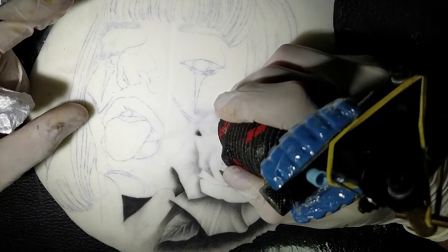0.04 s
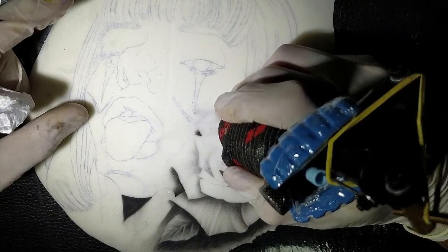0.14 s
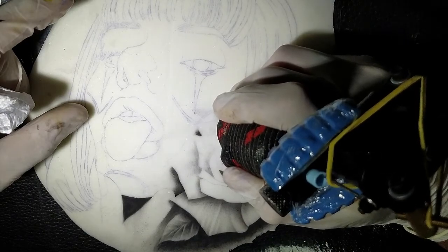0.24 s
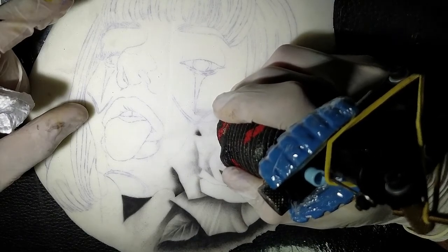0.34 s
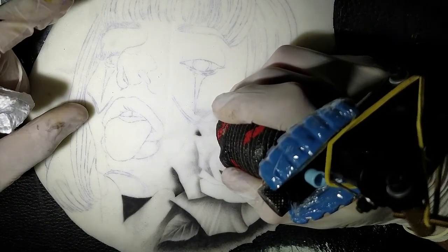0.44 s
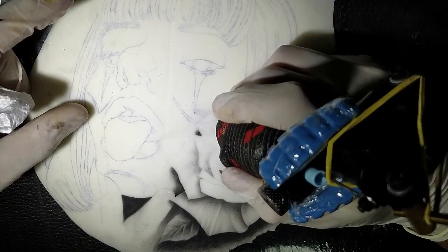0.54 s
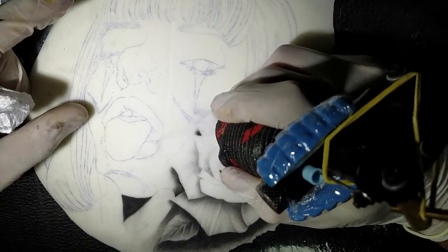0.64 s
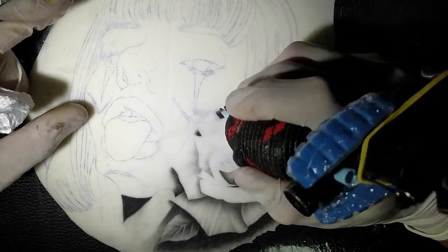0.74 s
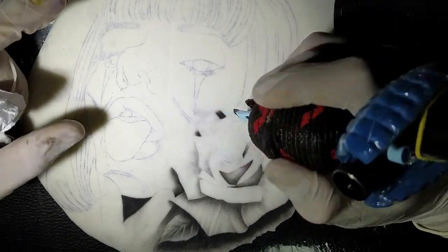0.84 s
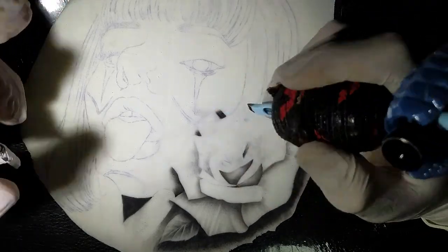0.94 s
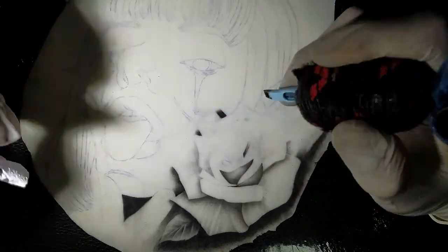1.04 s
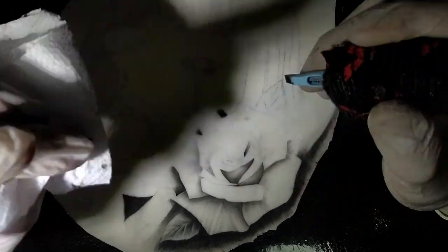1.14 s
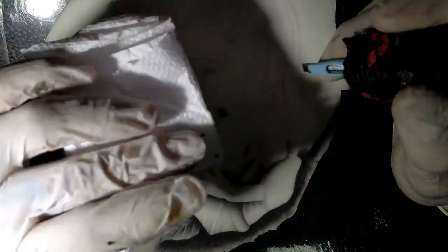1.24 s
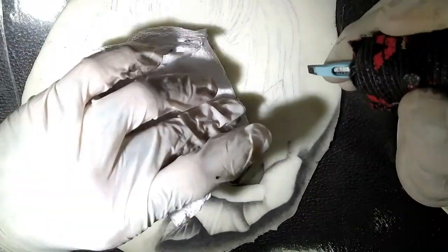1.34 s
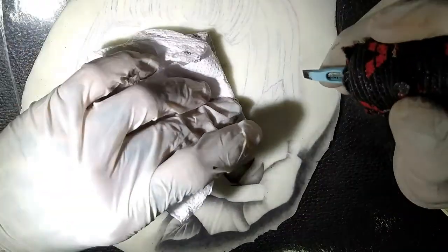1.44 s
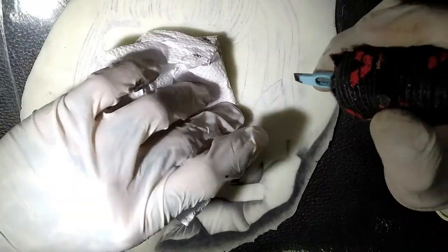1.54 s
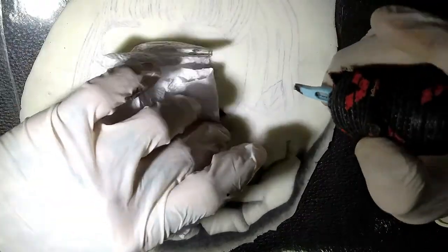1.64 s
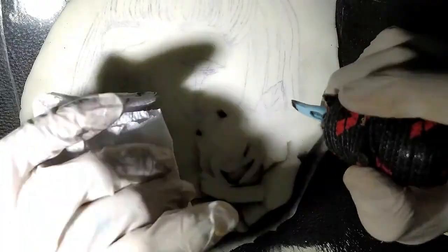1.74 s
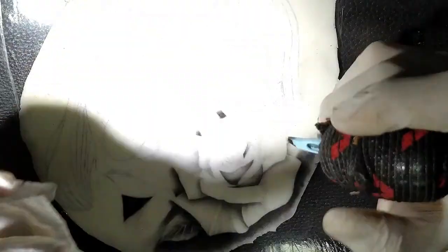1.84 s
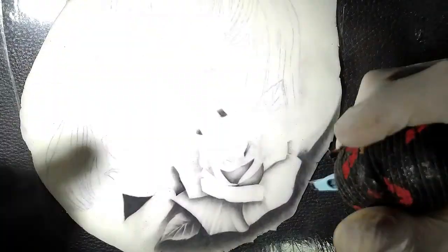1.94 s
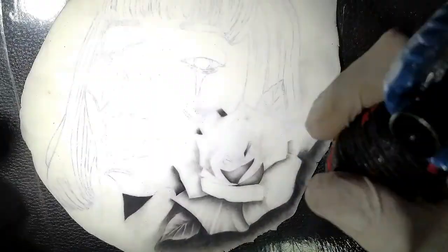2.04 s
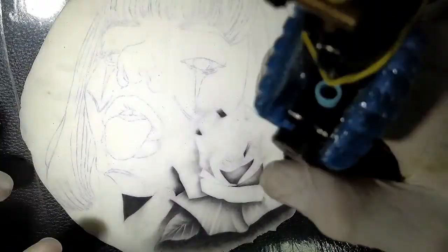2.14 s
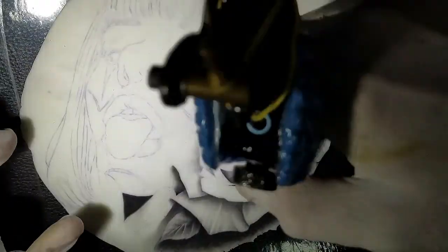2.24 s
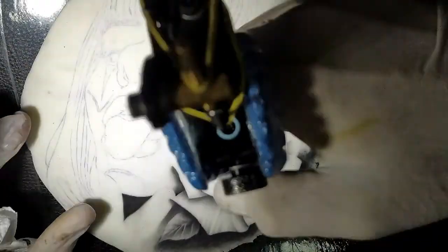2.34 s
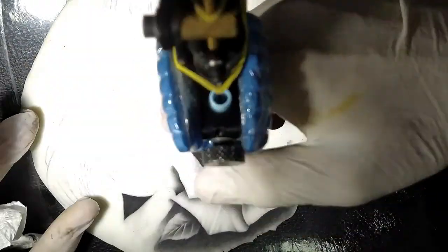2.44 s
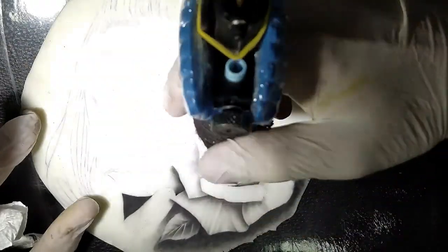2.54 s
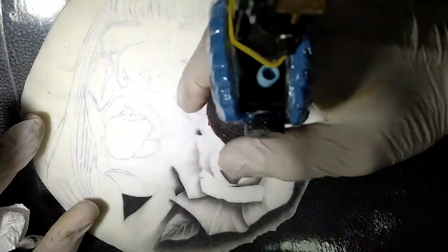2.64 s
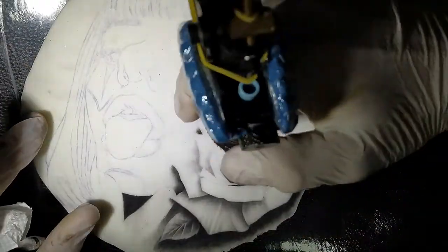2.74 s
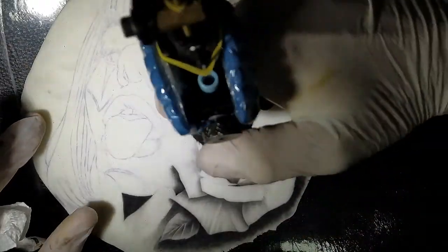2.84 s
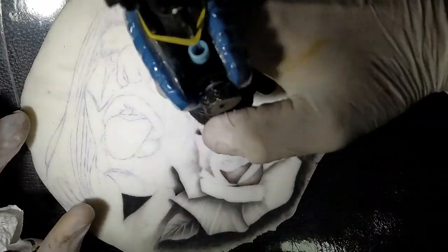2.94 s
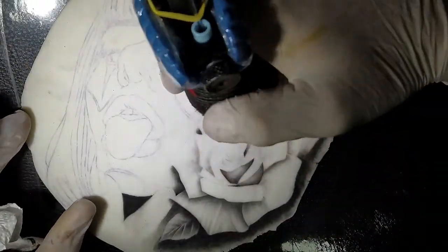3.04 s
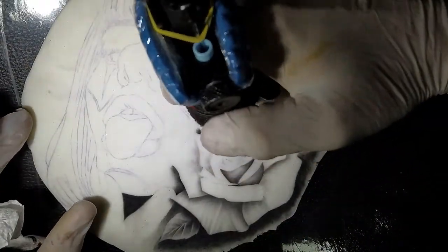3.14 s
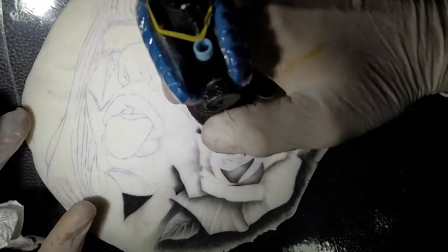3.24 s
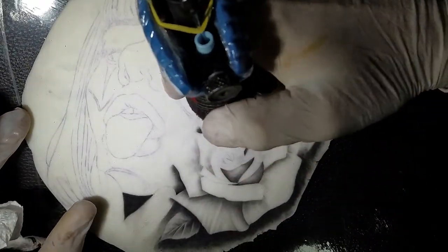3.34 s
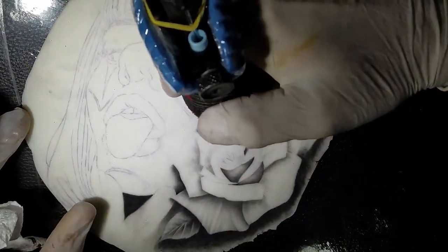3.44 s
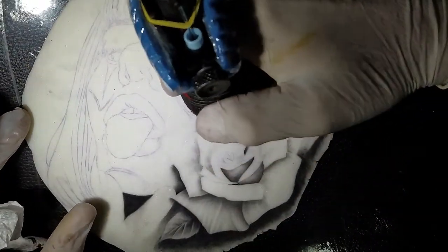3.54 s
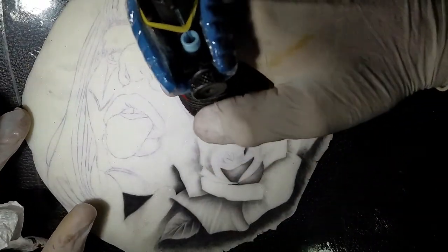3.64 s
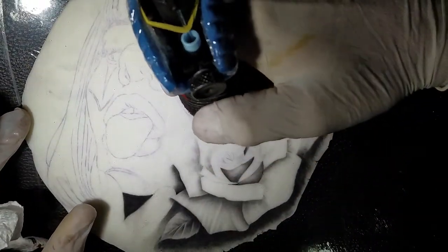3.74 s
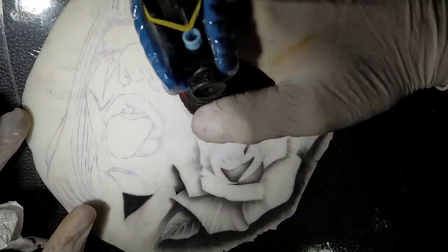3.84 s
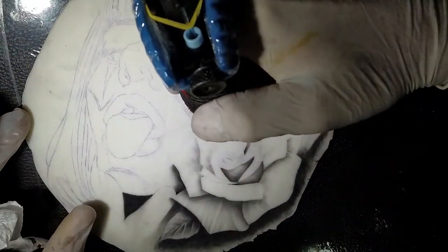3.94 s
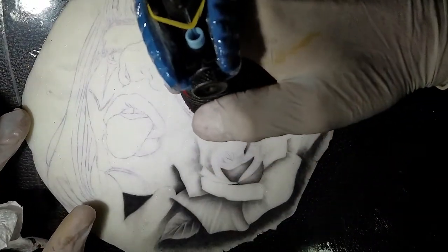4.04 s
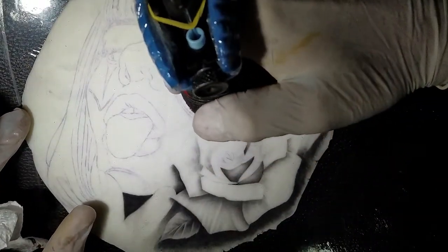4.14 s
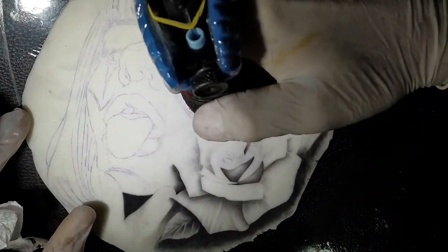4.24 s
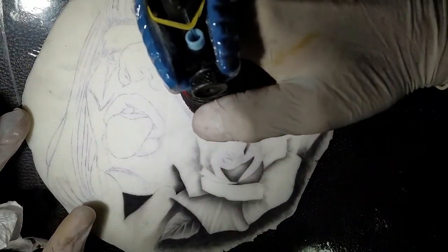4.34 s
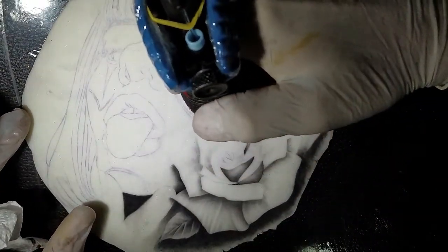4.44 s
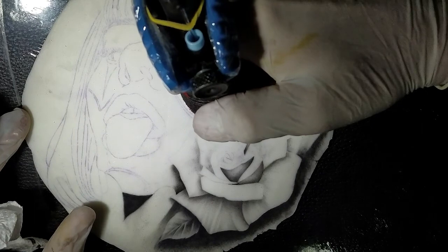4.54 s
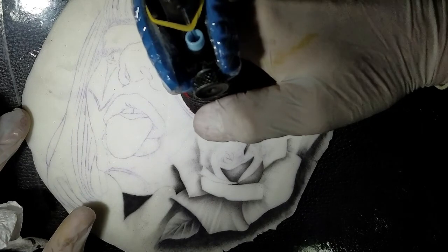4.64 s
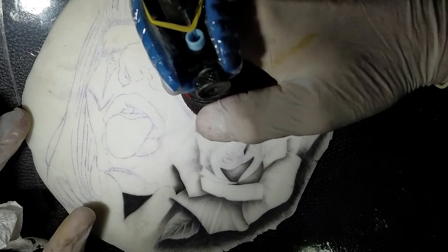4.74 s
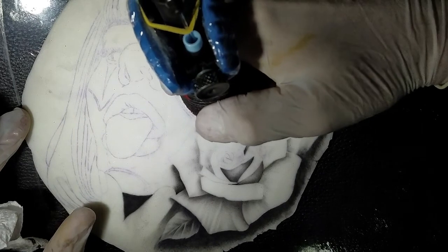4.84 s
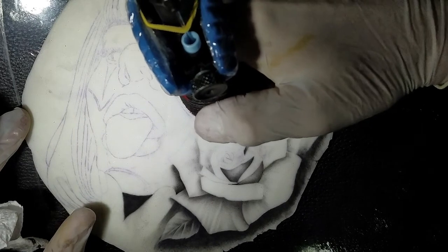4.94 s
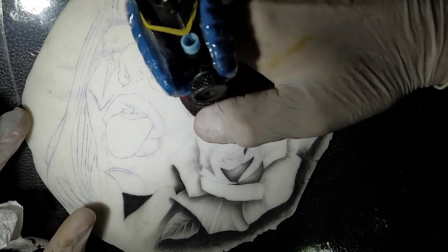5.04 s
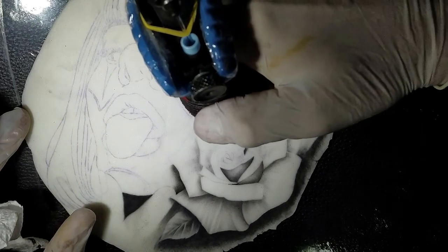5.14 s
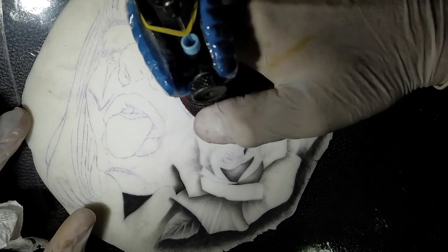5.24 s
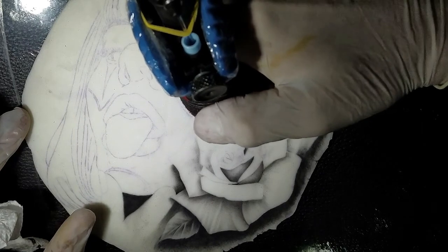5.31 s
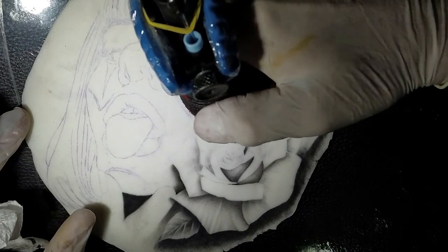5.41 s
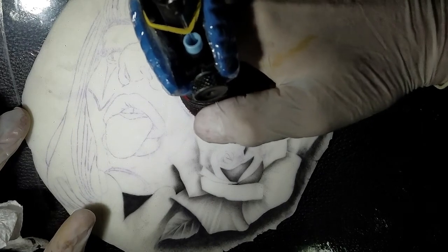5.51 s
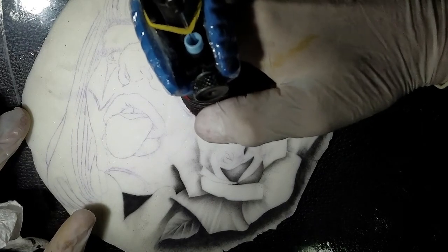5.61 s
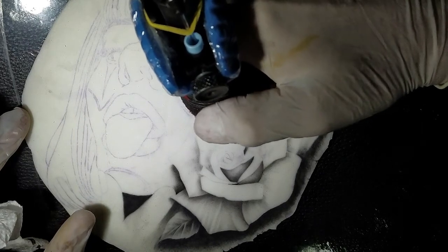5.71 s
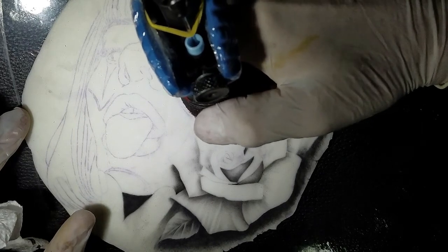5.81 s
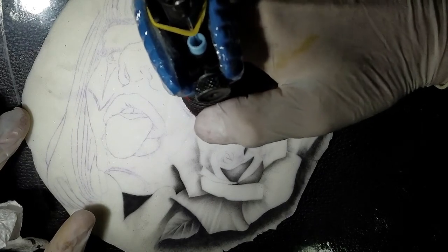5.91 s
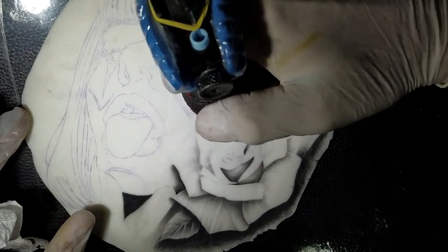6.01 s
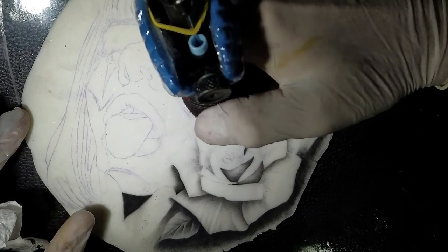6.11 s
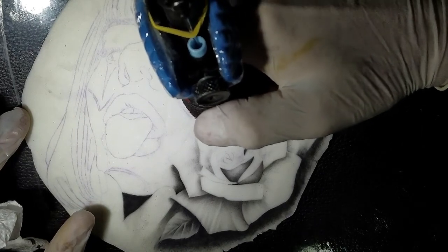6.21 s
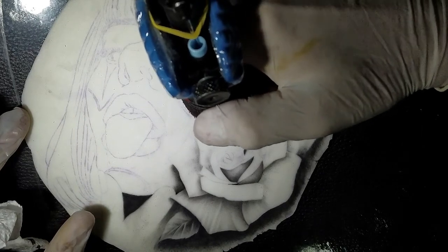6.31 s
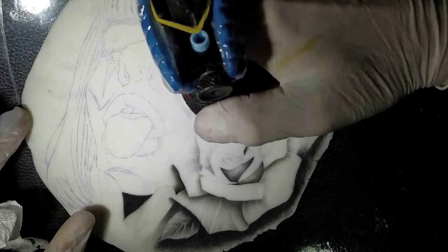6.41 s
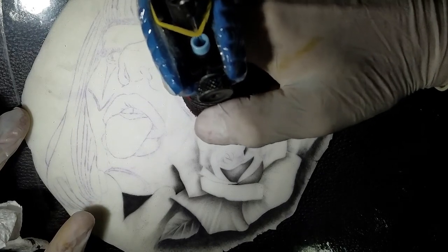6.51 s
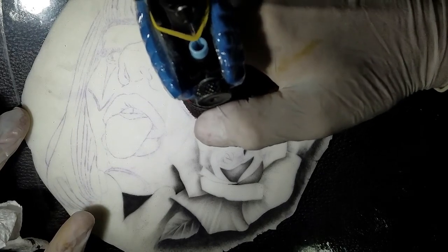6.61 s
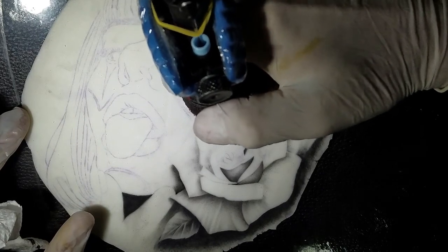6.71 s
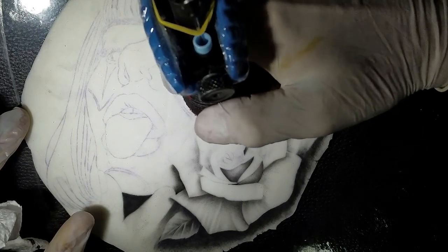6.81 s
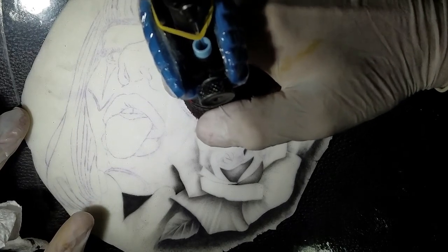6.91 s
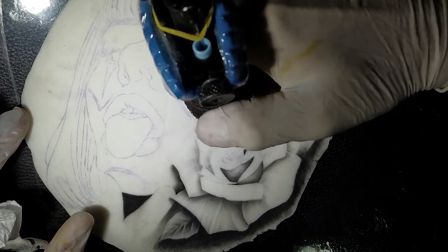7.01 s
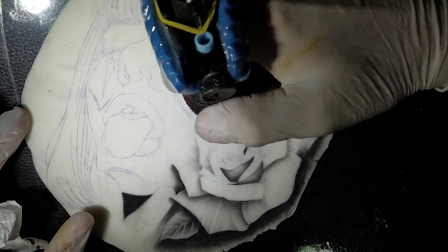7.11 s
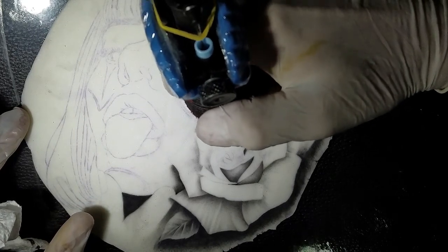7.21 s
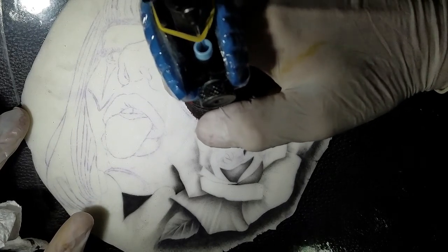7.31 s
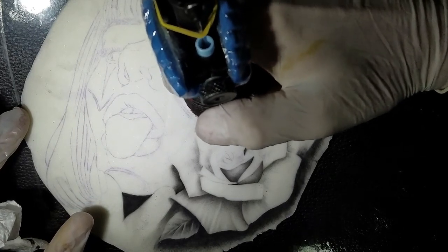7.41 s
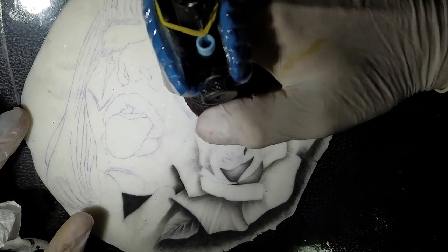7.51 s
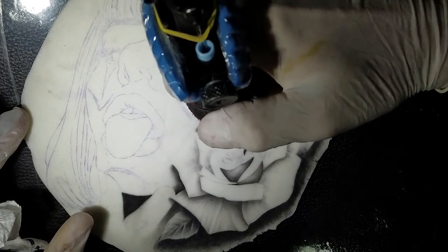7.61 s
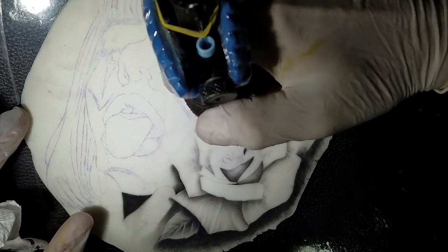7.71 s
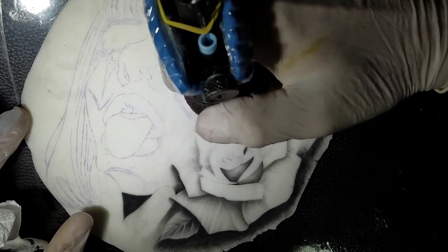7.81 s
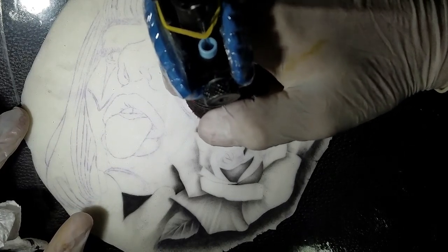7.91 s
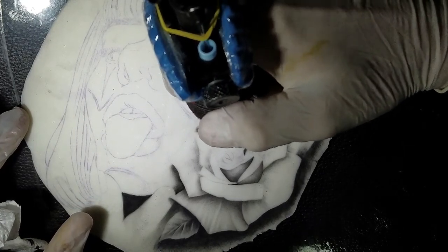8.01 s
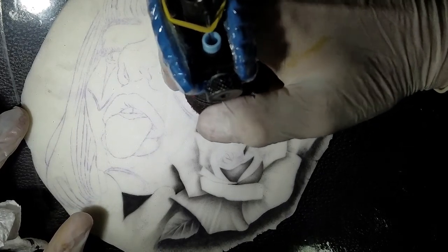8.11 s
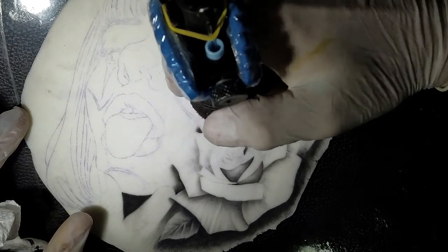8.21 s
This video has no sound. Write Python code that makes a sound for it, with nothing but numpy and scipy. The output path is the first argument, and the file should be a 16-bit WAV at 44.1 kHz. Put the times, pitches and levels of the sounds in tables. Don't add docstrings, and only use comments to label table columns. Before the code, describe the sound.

Close raspy electric buzzing cuts out, restarts briefly after bright ticks, cuts out again, then drones on with small gritty catches in a hard room.

```python
import sys
import numpy as np
from scipy import signal
from scipy.fft import rfft, irfft
from scipy.io import wavfile
from scipy.ndimage import uniform_filter1d

SR = 44100
rng = np.random.default_rng(int(sys.argv[2]) if len(sys.argv) > 2 else 0)


def generate_wav(signal):
    frames = np.transpose(np.atleast_2d(signal))
    scaled = np.clip(frames, -1, 1) * 32767
    pcm = np.round(scaled).astype(np.int16)
    wavfile.write(sys.argv[1], SR, pcm)


def level_to_linear(level):
    exponent = np.asarray(level, float) / 20
    return 10 ** exponent


N = 364266
SIDES = np.array([[.5], [-.5]])

# multiple of the shaft rate [1], level/dB
FAN_HARMONICS = [(2, 0), (4, -13), (6, -2), (7, -10), (8, -11), (9, -15), (11, -19), (15, -21), (34, -21),
                 (36, -29), (38, -25), (40, -26)]
# f/Hz, level/dB [per Hz]
FAN_AIR = [(15, -43), (32, -7), (64, -14), (92, -16), (108, -14), (200, -2.5), (330, -7), (516, -10),
           (695, -9.5), (754, -15), (962, -13.5), (1230, -18), (4140, -34), (16000, -37)]
# t/s, level/dB
LOWEST_HUM = [
    (0, 1.5),
    (2.38, 1.5),
    (2.47, -1.2),
    (8.26, -1.2),
]
# t/s, level/dB
GAIN = [
    (0, -45.5),
    (.5, -46.5),
    (1.1, -42),
    (1.74, -39.5),
    (1.82, -43),
    (2.38, -38.5),
    (2.47, -45),
    (8.26, -45),
]
# t/s, level/dB
TOWEL = [
    (1.2, -43.5),
    (1.42, -56.5),
    (1.545, -50),
    (1.565, -42),
    (1.645, -50),
    (1.656, -40),
    (1.665, -47),
    (1.725, -54),
]
# t/s, level/dB, low ring level/dB
SPRING_TICKS = [
    (1.7351, -20, -5),
    (1.745, -17, 2),
    (1.7553, -16, -5),
    (1.7656, -14, 4),
    (2.379, -16.5, -8),
    (2.3877, -6, -14),
    (2.398, -8, -7),
    (2.4088, -5, -9),
    (2.4184, -3, -8),
]
# t/s, rate [strokes per s]
STROKE_RATE = [
    [(0.0074, 111.2), (.7, 110.8), (.84, 113), (.93, 106.5), (1.0405, 104.2)],
    [(1.7718, 110.4), (2.186, 103.8)],
    [(2.4245, 108.5), (2.67, 106), (2.95, 110.6), (3.2, 109.6), (3.5, 109.4), (3.9, 110.0), (4.15, 110.7),
     (4.5, 110.5), (4.8, 109.5), (5.4, 108.9), (6.4, 108.9), (6.55, 110.2), (6.7, 109.5), (6.95, 109.9),
     (7.15, 111.0), (7.5, 110.75), (8.26, 110.7)],
]
# t/s, pose [0 slanted, 1 lifted, 2 turning, 3 upright, 4 eased]
GRIP = [
    (0, 0),
    (.86, 0),
    (.92, 1),
    (2.3, 1),
    (2.4, 2),
    (2.98, 2),
    (3.06, 3),
    (6.45, 3),
    (6.55, 4),
    (8.26, 4),
]
# t/s, state [0 slanted, 1 lifted, 2 upright, 3 pressed, 4 pressed and sliding]
NEEDLE = [(0, 0), (.86, 0), (.92, 1), (2.3, 1), (2.4, 2), (3.47, 2), (3.55, 3), (4.68, 3), (4.76, 4),
          (6.45, 4), (6.55, 2), (8.26, 2)]
# t/s, slap level/dB, loosely held frame ring level/dB, needle thud level/dB
HAND = [(0, -25, -10.5, -21), (.7, -24.5, -9, -21), (.84, -23.5, -4, -19.5), (1.04, -26.5, -7.5, -29),
        (1.773, -26.5, -8, -28), (1.781, -25.5, -5, -23.5), (2.05, -23.5, -5.5, -26.5),
        (2.19, -28, -9, -27), (2.42, -22, -17.5, -17.5), (2.72, -24, -9.5, -17.5), (2.91, -20, -10, -13.5),
        (3.05, -23.5, -18, -13), (3.45, -22.5, -12, -16), (3.56, -21.5, -7, -8.5),
        (4.7, -21.5, -7.5, -11.5), (6.4, -21.5, -8.5, -10.5), (6.6, -22.5, -12, -14.5),
        (8.26, -22.5, -10, -17)]
# t/s, length/s, thud level/dB
CATCHES = [(2.524, 0.02, 5), (2.687, 0.04, -6.5), (2.917, 0.047, 3.5), (3.02, 0.033, 0.5),
           (3.09, 0.012, -8), (3.158, 0.018, 1), (3.627, 0.011, 1), (3.727, 0.013, 2), (3.785, 0.027, -3),
           (3.832, 0.014, 3), (3.864, 0.016, -5), (3.886, .015, 3), (3.918, 0.023, -6), (4.03, 0.033, 4.5),
           (4.156, 0.023, -1), (4.17, 0.0069, 8), (4.678, 0.022, 4.5), (4.73, 0.018, -3), (4.994, 0.01, -4),
           (5.02, 0.017, 2.5), (5.3, 0.027, -1.5), (5.747, 0.017, 1), (5.787, .01, -3), (6.133, 0.092, 1),
           (6.227, 0.021, 2), (6.505, 0.017, 4.5), (6.563, .012, -4), (7.24, 0.02, 3.5),
           (7.268, 0.017, -10), (7.59, .015, -6), (7.672, 0.022, -3), (7.744, 0.048, 3), (7.91, 0.014, 3),
           (7.95, 0.019, -5), (8.013, 0.016, 2), (8.083, 0.023, -2.5)]
# f/Hz, width/Hz, level/dB [slanted, lifted, upright, pressed, sliding], delay/ms
THUD_RINGS = [(109, 63, 1, 5, 9, 6.5, 9.5, 2.75), (315, 370, -3, -5, 6, 3.5, 8, 1.37),
              (427, 58, 7.5, -10, -29, 1, 1, 1.6), (552, 40, 11, -18, -13, -3, -1, 2.25),
              (646, 57, -3, 17.5, 1, 10.5, 4.5, 2.03), (774, 73, 8, 10, 1, -12, 0, 2.54),
              (800, 210, -4, 0, 8.5, 5, 9.5, 2.42), (1198, 333, 2.5, 10.5, 10.5, 5.5, 6.5, 1.668),
              (1785, 720, 3, 10, 8.5, 0, 2, 0.7), (2510, 640, -36, -36, 8.5, 7.5, 5.5, 0.44)]
# f/Hz, width/Hz, level/dB [slanted, lifted, upright, pressed], left minus right/dB
FRAME_RINGS = [(3607, 116, 0.5, 3, 1.5, 1.5, -3.5), (4624, 1310, -1.5, -3.5, -4.5, -5.5, -6),
               (4527, 107, -11, -16, -23, -19.5, -3.5)]
# f/Hz, width/Hz, share taken out [slanted, upright]
FRAME_DIPS = [(3150, 200, 0.39, 0.41), (4220, 145, 0.44, 0.15), (3850, 126, 0.1, 0.27),
              (4830, 300, 0.37, 0.65), (6400, 680, 0.13, 0.084)]
# delay/ms, level/dB [slanted, upright, pressed], timing scatter/ms, level scatter/dB
CONTACTS = [
    (0, 5.5, 7.5, 6, 0.021, 1.5),
    (-0.8, -10.5, -14, -11, 0.071, 2),
    (-0.36, -8, -13, 0, 0.038, -1),
    (0.65, -8, 4, -1.5, 0.034, 4),
    (1.3, -17, -1, -4.5, 0.059, 5.5),
    (1.798, -6, -21, -15, 0.081, 0),
    (3.5, -18, -6.5, -21, 0.065, 7.5),
]
# f/Hz, width/Hz, level/dB [slanted, lifted, turning, upright, eased]
SLAP_RINGS = [(2968, 350, 0.5, -8, -4, -5.5, -2.5), (5470, 460, -6, -6, -11, -12.5, -11.5),
              (7190, 1920, 1, 2, -3.5, -4.5, -4.5), (7946, 960, 5, 4.5, 1.5, 4, 4),
              (8530, 740, 4.5, 6.5, 6, 2.5, 3.5), (9300, 1520, -4.5, -4, 0, -5, -4),
              (9890, 1100, 4.5, 2, 0, -2.5, -2), (11094, 660, -7, 2.5, -8.5, -3, -3.5),
              (12570, 2040, -7.5, -1.5, -14, -13.5, -11), (13440, 810, -8, -8, -9, -12, -12),
              (14700, 800, -7, -6, -9, -14, -7)]
# left minus right/dB [slanted, lifted, turning, upright, eased]
SLAP_PAN = [(-4, 6.5, -3, 2.5, 1), (14, -2, 7, 11, 17), (2.5, -2, -2, 1.5, 1.5), (-2.5, 3, 3, 0, 0.5),
            (-9, -4, 1, -3.5, 0.5), (7, 6, 2.5, -5, -1), (5, 17.5, 10, -5.5, 1), (23, 15, 12, 8.5, 7.5),
            (19, 9.5, 12, 6, 2), (-3, -3, -8, -10, -13), (0, 0, 6, 8, 6)]


def curve(rows, column):
    rows = np.asarray(rows, float)
    return np.interp(np.arange(N) / SR, rows[:, 0], rows[:, column])


def by_state(state, values, first=0):
    return np.interp(state, np.arange(len(values)) + first, values)


def unit(x):
    return x / np.sqrt(np.mean(x ** 2))


def clicks(at_s, size):
    at = np.clip(at_s * SR, 0, N)
    taps = np.floor(at)[:, None] + np.arange(-7, 9)
    offset = taps - at[:, None]
    shape = np.sinc(offset) * np.cos(np.pi * offset / 16) ** 2
    places = (taps + 8).astype(int).ravel()
    return np.bincount(places, (shape * size[:, None]).ravel(), N + 32)[8:N + 8]


def ring(x, hz, width_hz):
    return signal.lfilter(*signal.iirpeak(hz, hz / width_hz, SR), x)


def steep(x, hz, width_hz):
    return ring(ring(x, hz, width_hz), hz, 2 * width_hz)


def rattle(hits, ms):
    decay = np.exp(-1000 / (ms * SR))
    return signal.lfilter([1], [1, -decay], np.abs(hits)) * rng.standard_normal(N)


def walk(rate):
    k = int(SR / rate)
    held = np.repeat(rng.standard_normal(N // k + 1), k)
    return unit(uniform_filter1d(uniform_filter1d(held, k), k)[:N])


def coloured(points, shape):
    hz, db = np.transpose(points)
    gain = level_to_linear(np.interp(np.log(np.fft.rfftfreq(N, 1 / SR) + 1), np.log(hz), db))
    return irfft(rfft(rng.standard_normal(shape)) * gain, N)


def fan():
    shaft_hz, lag_ms, pan_db, air_db, shared_below_hz = 29.02, .35, 2, -0.5, 404
    turns = np.cumsum(shaft_hz * (1 + 0.00198 * walk(1.93))) / SR
    lowest_db = curve(LOWEST_HUM, column=1)
    hum = 0
    for k, db in FAN_HARMONICS:
        level_db = db + (k == 2) * lowest_db + min(k / 3.2, 2.5) * walk(7)
        hum = hum + level_to_linear(level_db) * np.sqrt(2) * np.sin(2 * np.pi * (k * turns + rng.random()))
    hum = np.array([hum, np.roll(hum, int(lag_ms * SR / 1000))])
    air = coloured(FAN_AIR, (3, N))
    bass = signal.butter(1, shared_below_hz, fs=SR, output="sos")
    air = air[1:] + signal.sosfilt(bass, air[0] - air[1:])
    return level_to_linear(curve(GAIN, column=1) + pan_db * SIDES) * (hum + level_to_linear(air_db) * unit(air))


def towel():
    t = np.arange(N) / SR
    scrape = coloured([(1200, -17), (3000, -4.0), (7000, -9), (11000, -5.5), (14000, -37)], (2, N))
    scrape = unit(scrape * level_to_linear(2.0 * walk(51.6)))
    touching = (t > TOWEL[0][0]) & (t < TOWEL[-1][0])
    return scrape * level_to_linear(curve(TOWEL, column=1)) * touching


def room(x):
    t60_s, treble_t60_s, gap_ms = 0.59, 0.46, 0.52
    t = np.arange(SR) / SR
    noise = rng.standard_normal((2, SR))
    low = signal.sosfilt(signal.butter(2, 5000, fs=SR, output="sos"), noise)
    echoes = low * level_to_linear(-60 * t / t60_s) + (noise - low) * level_to_linear(-60 * t / treble_t60_s)
    echoes = echoes * (1 - np.exp(-(1000 * t / gap_ms) ** 2))
    echoes = echoes / np.sqrt(np.sum(echoes ** 2) / 2)
    return irfft(rfft(x) * rfft(echoes, N), N)


def wind_up():
    at, db, low_db = np.transpose(SPRING_TICKS)
    tick = clicks(at + 0.00057, level_to_linear(db + 9.5))
    low = clicks(at + 0.0006, level_to_linear(db + low_db + 21.5))
    tick = tick + level_to_linear(-10.5) * rattle(tick, ms=0.47)
    spring = steep(tick, 8300, 4000) - level_to_linear(-5.0) * steep(tick, 11300, 2800)
    spring = spring + level_to_linear(-6.0) * steep(tick, 14300, 3500)
    return spring + steep(low, 3020, 380)


def strokes():
    t, at = np.arange(N) / SR, []
    wobble = 1 + .004 * walk(7)
    for run in STROKE_RATE:
        turns = np.cumsum((t >= run[0][0]) * curve(run, column=1) * wobble) / SR
        found = np.interp(np.arange(int(turns[-1])) + 1e-3, turns, t)
        at.append(found[found <= run[-1][0]])
    return np.concatenate(at)


def needle_scratch(needle):
    scratch = coloured([(200, 3), (600, -2.0), (1500, -2.0), (2400, -3.5), (3200, -45)], (2, N))
    level_db = by_state(needle, (-17, -15, -8.5, -11))
    return unit(scratch) * level_to_linear(level_db + 4.35 * walk(40))


def pad_catches(upright):
    grid_s = np.arange(0, N / SR, .001)
    swells = sum(db * np.exp(-((grid_s - s) / length) ** 2) for s, length, db in CATCHES)
    slips = .5 * np.clip(upright, .3, 1) * walk(25)
    return np.interp(np.arange(N) / SR, grid_s, swells) + slips


def needle_thud(at, needle, upright):
    thud, chance = 0, rng.standard_normal((len(at), 3)).T
    for hz, width_hz, *db, ms in THUD_RINGS:
        size_db = 2.5 * chance[1 + (ms < 1)]
        knock = clicks(at + (ms + 0.077 * chance[0]) / 1000, level_to_linear(size_db))
        thud = thud + level_to_linear(by_state(needle, db) + 1.3 * walk(7)) * steep(knock, hz, width_hz)
    body = unit(thud) + needle_scratch(needle)
    pan_db = by_state(upright, (-11.5, 14.5))
    return level_to_linear(curve(HAND, column=3) + pan_db * SIDES + pad_catches(upright) - 26.5) * body


def frame_ring(blow, push, needle):
    held_db, frame = [curve(HAND, column=2), 0, 0], 0
    for k, (hz, width_hz, *db, pan_db) in enumerate(FRAME_RINGS):
        tone = unit(ring(steep(blow + level_to_linear(-0.5) * push, hz, width_hz), hz, 810))
        level_db = held_db[k] + by_state(needle, db) + pan_db * SIDES + 0.24 * walk(4.5)
        frame = frame + level_to_linear(level_db) * tone
    return frame


def contacts(at, needle_at):
    hits = []
    for ms, *db, loose_ms, loose_db in CONTACTS:
        chance = rng.standard_normal((len(at), 2)).T
        size_db = by_state(needle_at, db, first=1) + loose_db * chance[1]
        hits.append(clicks(at + (ms + loose_ms * chance[0]) / 1000, level_to_linear(size_db)))
    return hits[0], sum(hits)


def armature_slap(push, pose):
    slap = 0
    for k, ((hz, width_hz, *db), pan_db) in enumerate(zip(SLAP_RINGS, SLAP_PAN)):
        level_db = by_state(pose, pan_db) * SIDES + by_state(pose, db) + 1.0 * walk(7)
        slap = slap + (-1) ** k * level_to_linear(level_db) * steep(push, hz, width_hz)
    return unit(slap)


def machine():
    at, pose, needle = strokes(), curve(GRIP, column=1), curve(NEEDLE, column=1)
    blow, hits = contacts(at, np.interp(at, *np.transpose(NEEDLE)))
    push = unit(hits) + level_to_linear(-18) * unit(rattle(hits, ms=.6))
    slap_gain = level_to_linear(curve(HAND, column=1) + .5 * walk(8))
    slap = slap_gain * armature_slap(push, pose)
    frame = slap_gain * frame_ring(unit(blow), push, needle)
    return slap, frame, needle_thud(at, needle, np.clip(pose - 1, 0, 1))


def delayed_spectrum(x, ms):
    return rfft(x) * np.exp(-2j * np.pi * np.fft.rfftfreq(N, 1 / SR) * ms / 1000)


def scene():
    slap, frame, thud = machine()
    needle = curve(NEEDLE, column=1)
    slap = slap + wind_up()
    left = irfft(delayed_spectrum(slap[0], ms=0.1) + delayed_spectrum(frame[0], ms=0.077), N)
    pan_db = by_state(needle, (-6, -3.5, 2, 5.5))
    room_db = by_state(needle, (2.3, 3.5, -1.24, 1))
    ports = np.array([left, slap[1] + frame[1]]) * level_to_linear(pan_db * SIDES)
    wet, facing = slap + level_to_linear(-7) * frame, 0.47
    wet = facing * wet + (1 - facing) * wet.mean(axis=0)
    buzz = ports + room(level_to_linear(room_db) * (wet + level_to_linear(-1) * thud[1]))
    for hz, width_hz, *share in FRAME_DIPS:
        buzz = buzz - by_state(needle, np.clip(share, 0, .95), first=1) * ring(buzz, hz, width_hz)
    return buzz + thud + fan() + towel()


def roll_off(x):
    return signal.sosfilt(signal.butter(12, 15900, fs=SR, output="sos"), x)


def record(dry):
    rounded = np.tanh(dry) / 0.82
    top_cut = signal.cheby1(5, .5, 15050, fs=SR, output="sos")
    return roll_off(signal.sosfilt(top_cut, rounded))


dry = scene()
out = record(dry)
generate_wav(out)
```